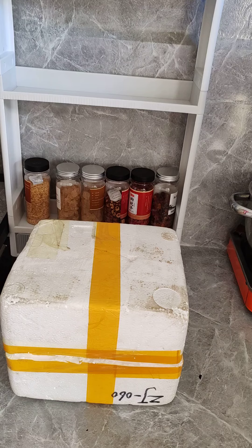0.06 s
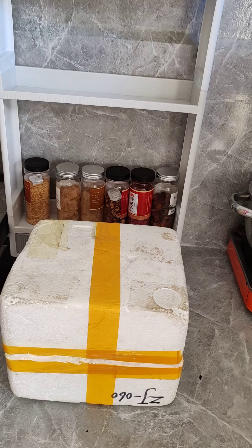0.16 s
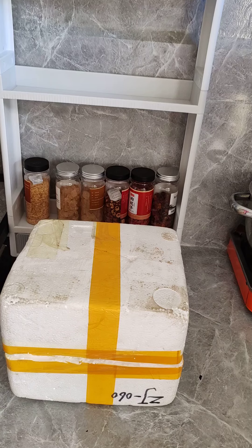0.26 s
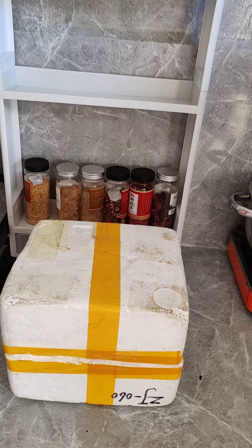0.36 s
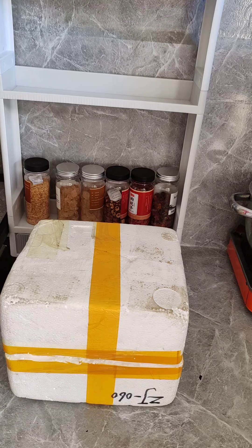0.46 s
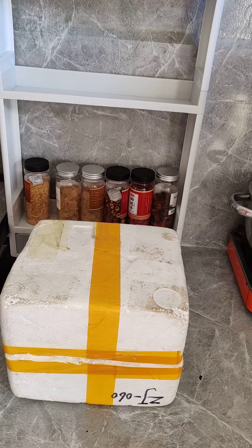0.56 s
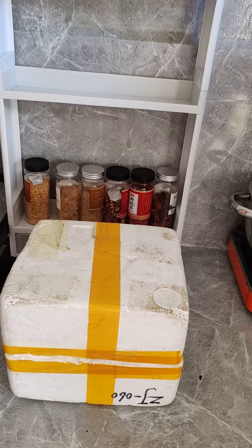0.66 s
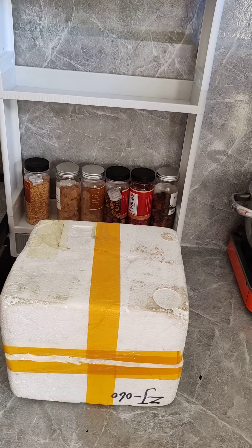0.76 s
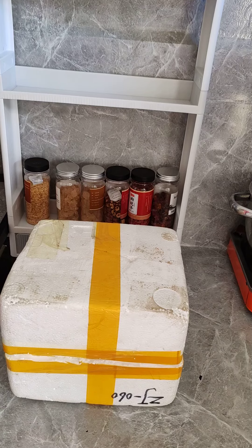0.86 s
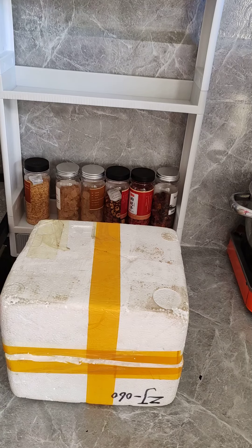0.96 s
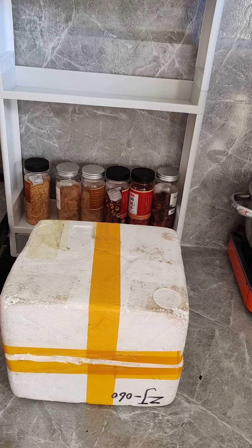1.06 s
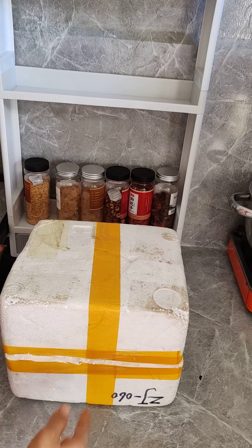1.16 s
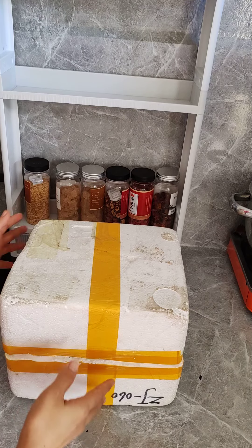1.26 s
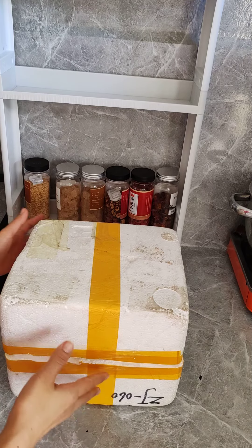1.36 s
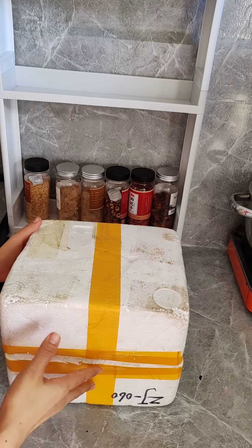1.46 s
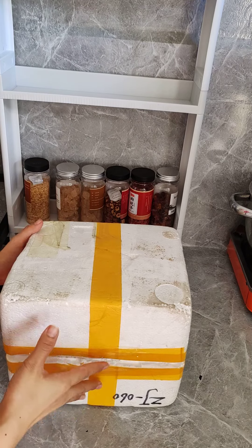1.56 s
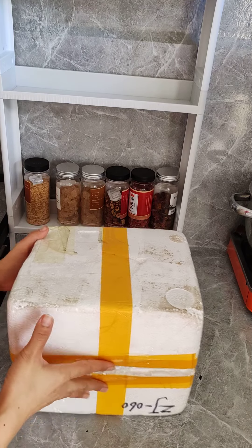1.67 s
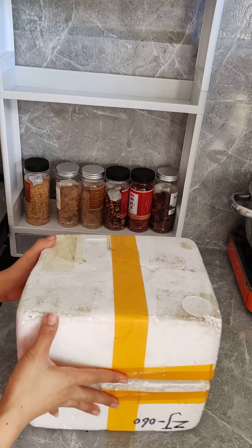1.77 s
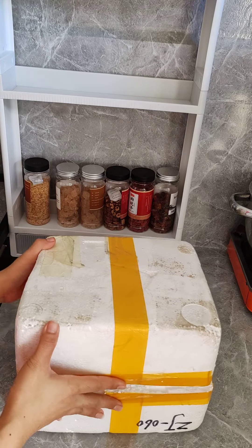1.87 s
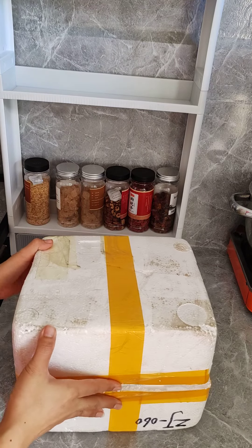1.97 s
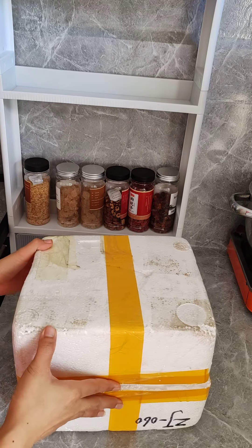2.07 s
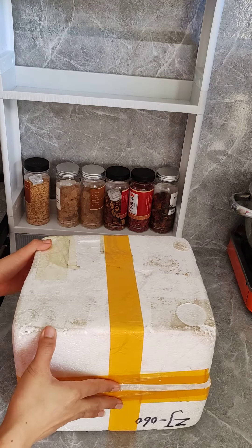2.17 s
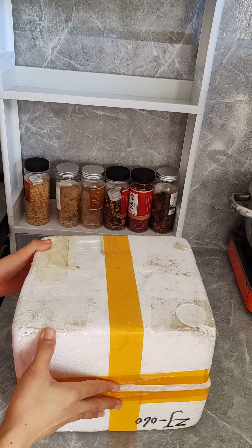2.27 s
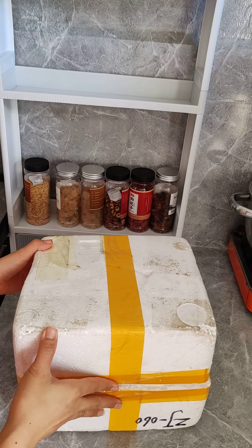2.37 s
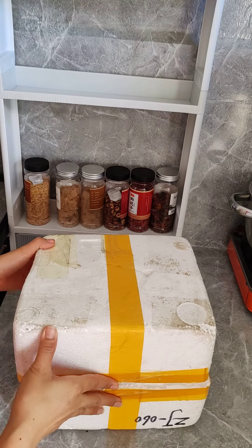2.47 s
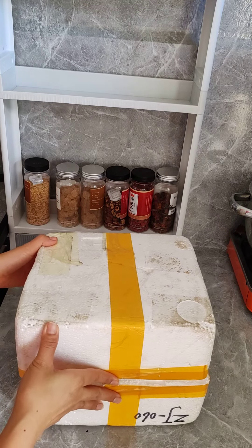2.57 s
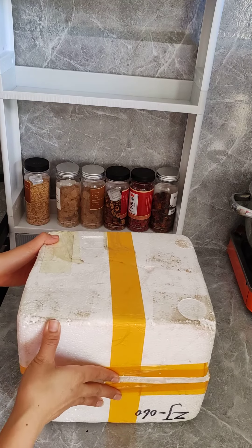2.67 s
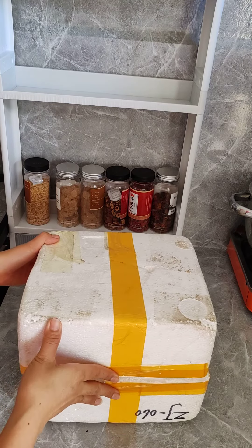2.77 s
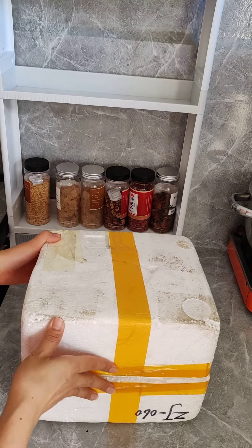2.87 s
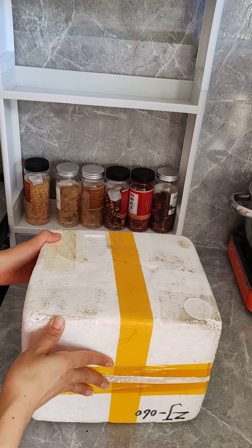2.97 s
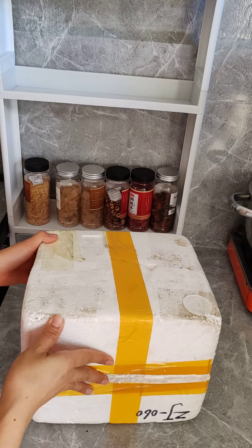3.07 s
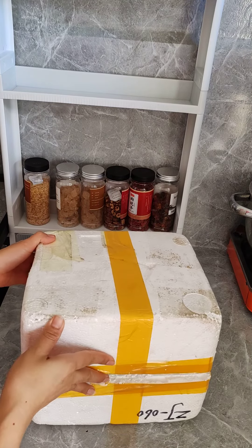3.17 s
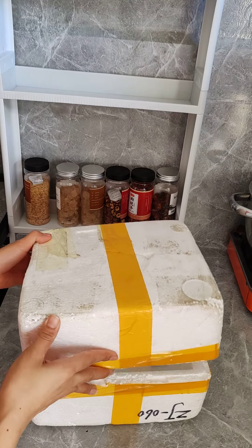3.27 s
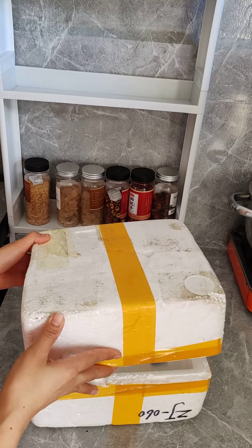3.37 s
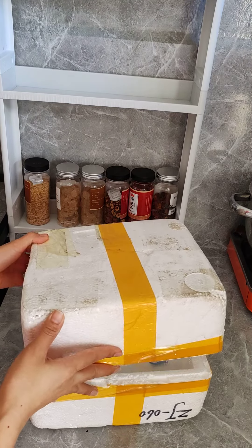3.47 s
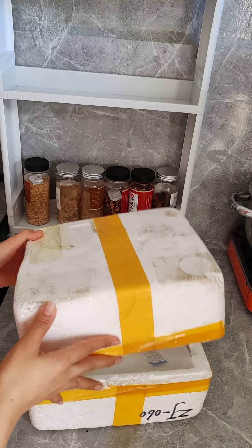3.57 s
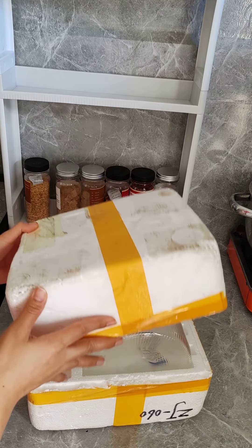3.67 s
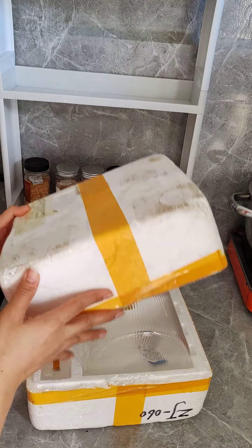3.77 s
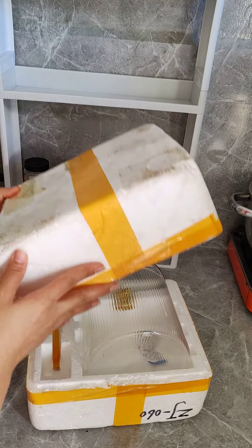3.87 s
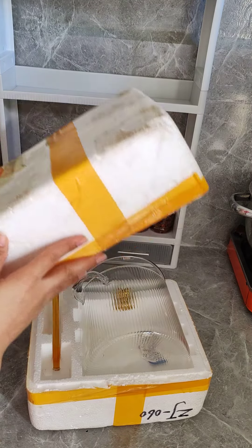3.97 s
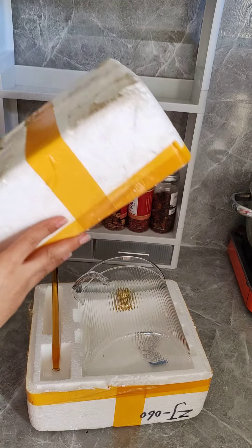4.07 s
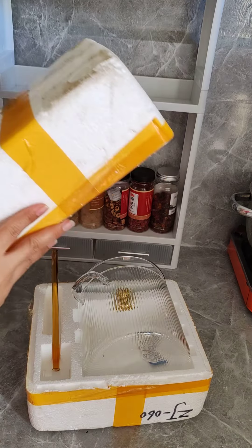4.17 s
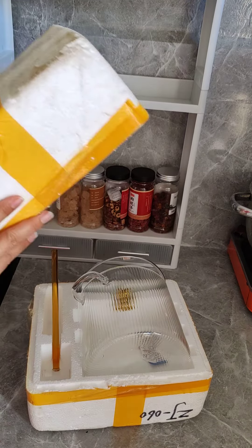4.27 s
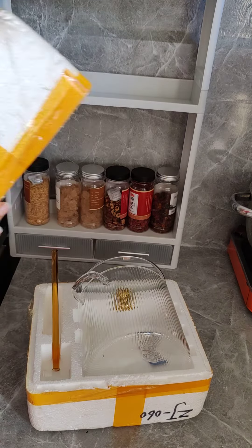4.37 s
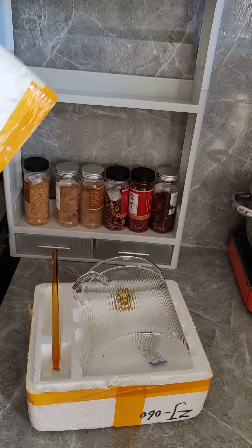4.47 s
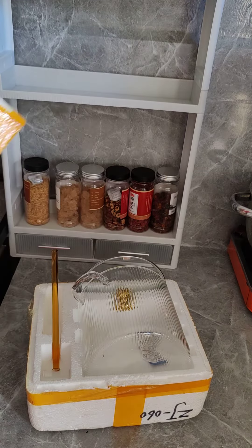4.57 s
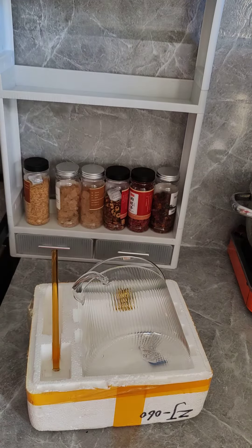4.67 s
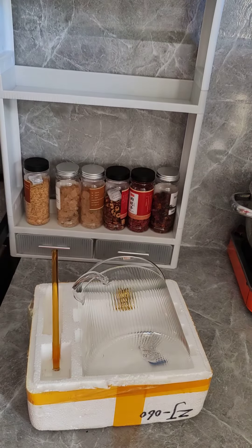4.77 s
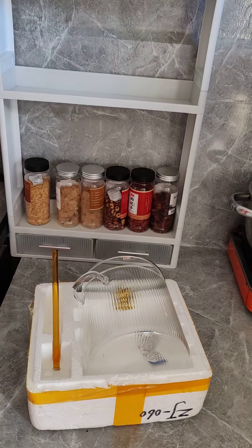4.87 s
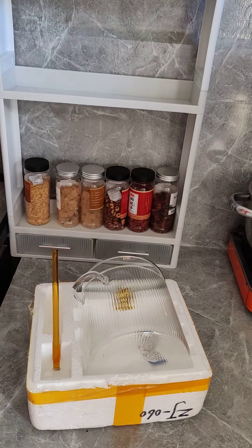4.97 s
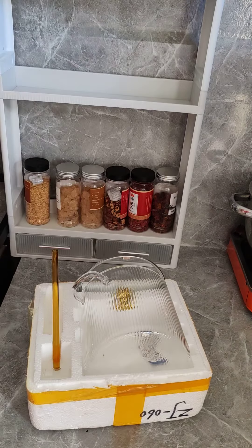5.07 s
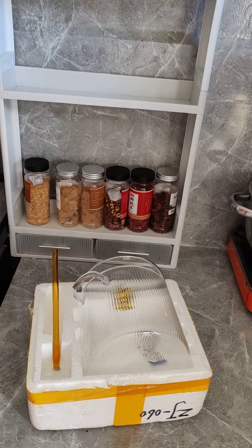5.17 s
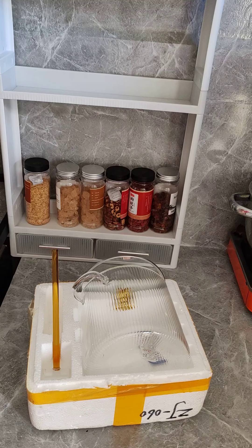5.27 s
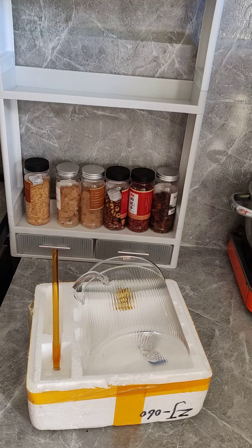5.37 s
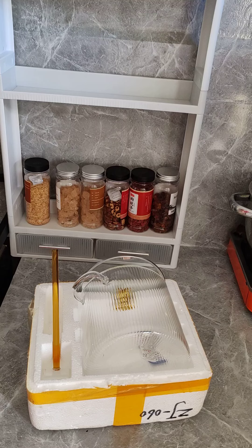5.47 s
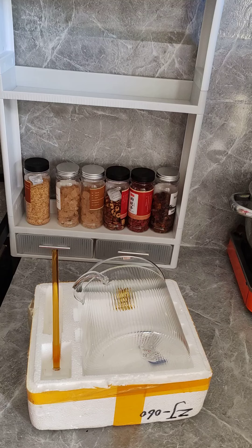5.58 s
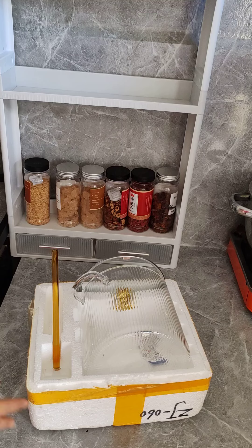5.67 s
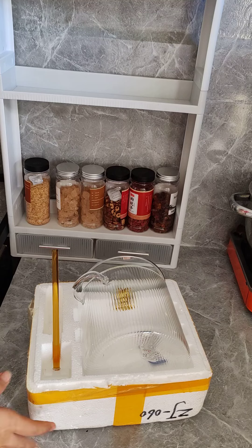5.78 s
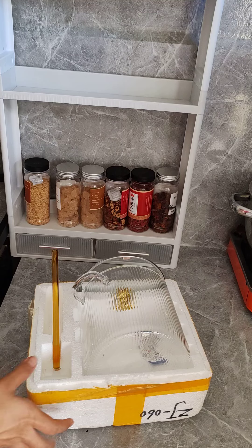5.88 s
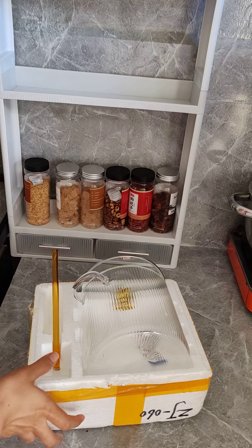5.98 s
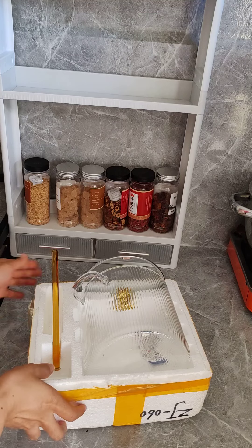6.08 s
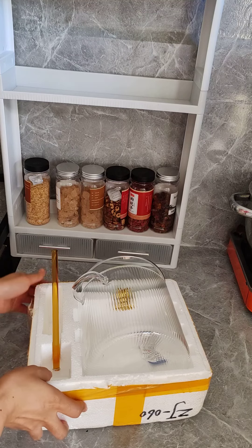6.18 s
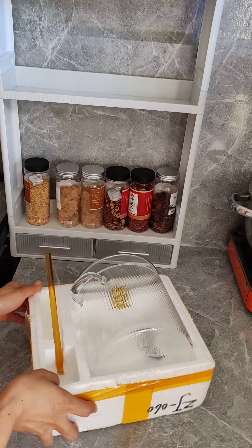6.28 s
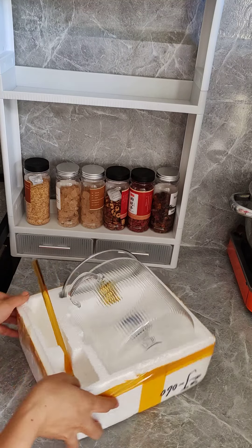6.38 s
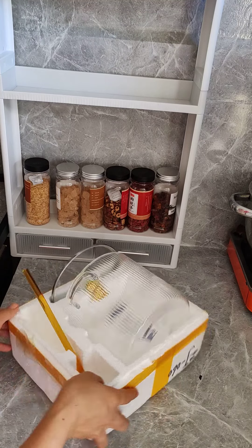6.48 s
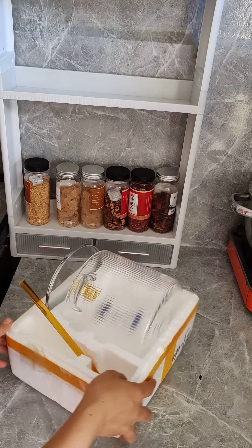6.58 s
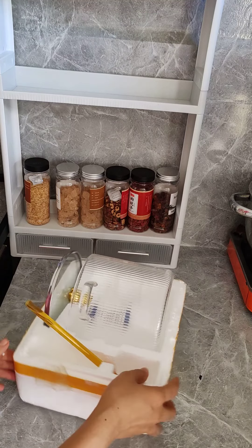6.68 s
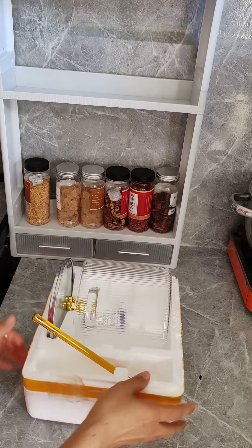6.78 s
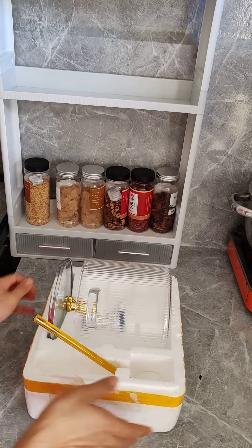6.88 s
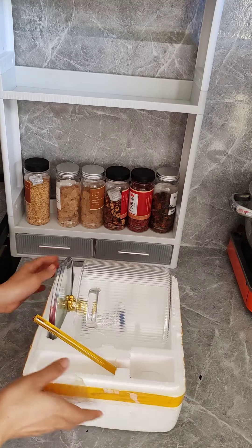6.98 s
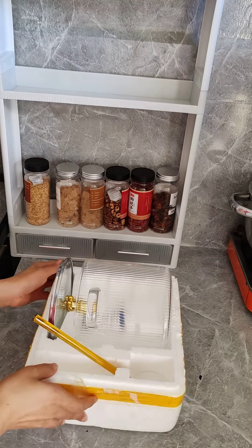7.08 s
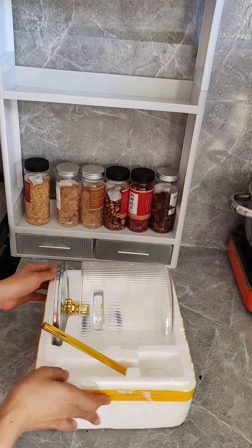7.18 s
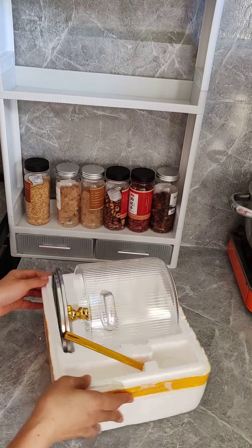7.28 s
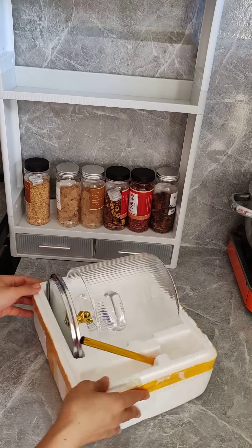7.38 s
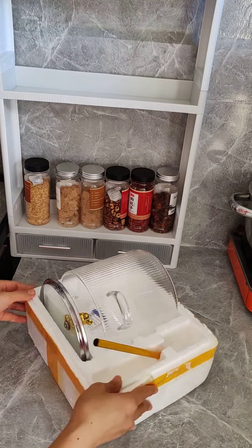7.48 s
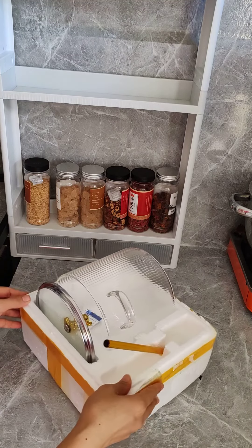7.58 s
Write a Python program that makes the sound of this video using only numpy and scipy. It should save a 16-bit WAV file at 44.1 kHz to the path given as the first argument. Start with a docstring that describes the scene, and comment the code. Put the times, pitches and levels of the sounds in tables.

```python
"""A foam box is dragged over a stone counter, its tight lid worked off with groans and squeaks; it is put down and turned.
Rubbing is shaped noise, stick-slip is a train of jolts or a gliding tone, and contacts are bursts and wall resonances.
A tiled kitchen answers with decaying noise; a low rumble, steady room noise and faint cloth lie underneath.
Two microphones hear the noises alike in the bass and almost unrelated in the treble."""
import sys
import numpy as np
from scipy import signal
from scipy.fft import rfft, irfft, next_fast_len
from scipy.io import wavfile
from scipy.ndimage import uniform_filter1d, map_coordinates

SR = 44100
rng = np.random.default_rng(int(sys.argv[2]) if len(sys.argv) > 2 else 0)


def wav_record(signal):
    """Record a signal, one row per channel, as 16-bit PCM in the file named by sys.argv[1]."""
    frames = np.transpose(np.atleast_2d(signal))
    bounded = np.clip(frames, -1, 1)
    # unit amplitude maps onto the largest positive 16-bit level
    quanta = np.round(bounded * 32767).astype(np.int16)
    wavfile.write(sys.argv[1], SR, quanta)


N = 336483
T = np.arange(N) / SR  # s
TOP_HZ = 16000  # upper band limit
SAG_JITTER, RISE_JITTER = 0.08, 0.034  # relative slip-rate jitter: slowing slips stumble, rising ones run evenly


def amp(db):
    """Level definition: the amplitude ratio of a level in dB."""
    return 10 ** (np.asarray(db) / 20)


def unit(x):
    """Normalization: x scaled to rms 1."""
    return x / np.sqrt(np.mean(x ** 2) + 1e-20)


def along(points, hz):
    """Logarithmic frequency scale: linear interpolation of (f/Hz, value) points over log frequency."""
    f, value = np.transpose(points)
    return np.interp(np.log(hz + 1), np.log(f + 1), value)


def spectrum(points):
    """Spectral shaping: a magnitude response through (f/Hz, level/dB) points."""
    return lambda hz: amp(along(points, hz))


def wobble(rate):
    """Band-limited fluctuation: a spline through random knots, rate of them a second."""
    knots = rng.standard_normal(int(N * rate / SR) + 4)
    return map_coordinates(knots, [T * rate])


def filtered(x, response):
    """Linear filtering: the spectrum of x times a complex frequency response."""
    m = next_fast_len(N + SR // 2)
    hz = np.fft.rfftfreq(m, 1 / SR)
    return irfft(rfft(x, m) * response(hz), m)[..., :N]


# Coherence of the two microphones: f/Hz, left-right likeness (1 = identical)
ALIKE = [(45, 0.91), (290, 0.9), (640, 0.36), (1400, 0.032), (15000, 0.07)]


def likeness(colour):
    """Spatial coherence: mid and side weights make the bass alike and the treble nearly unrelated."""
    def weights(hz):
        turn = np.arccos(np.clip(along(ALIKE, hz), -1, 1)) / 2
        return colour(hz) * [np.cos(turn), np.sin(turn)]
    return weights


def rush(colour, grain_db=0, patchy_db=0):
    """Modulated noise: stereo noise of rms 1, broken into uneven grains and passing patches of frequency."""
    z = signal.stft(rng.standard_normal((2, N)), nperseg=512)[2]
    field = uniform_filter1d(rng.standard_normal(z.shape[1:]), 3, axis=0)
    field = uniform_filter1d(field, 8, axis=1)
    pair = signal.istft(z * amp(patchy_db * unit(field)), nperseg=512)[1][:, :N]
    grain = amp(grain_db * (wobble(300) + 0.5 * wobble(40)))
    mid, side = filtered(pair * grain, likeness(colour))
    return unit(np.array([mid + side, mid - side]))


# Spectral density of the steady room noise: f/Hz, relative level per Hz/dB
AIR = [(60, -26.5), (90, -9.5), (270, -10.5), (500, -18.5), (960, -21.5), (2500, -33), (9000, -56.5),
       (12000, -100)]


def room_noise():
    """Stationary noise: a constant hush, strongest in the bass."""
    return amp(-57.0) * rush(spectrum(AIR))


# Level of the rumble in time: t/s, level/dB
RUMBLE = [(.2, -65), (.35, -53), (1.46, -55.5), (2.25, -45), (3.0, -50), (3.9, -65.5), (4.25, -48.5),
          (4.45, -64), (4.85, -47.5), (5.05, -57.5), (5.66, -44.5), (6.28, -49.5), (6.5, -42.5),
          (7.3, -54.5), (7.5, -43), (7.63, -48)]
# Spectral density of the rumble: f/Hz, relative level per Hz/dB
LOW = [(28, -44), (38, -5.5), (46, -2.5), (62, -11), (95, -19.5), (130, -71)]


def rumble():
    """Low-frequency noise: a narrow bass band whose level rises and falls slowly."""
    level_db = np.interp(T, *np.transpose(RUMBLE))
    return amp(level_db) * rush(spectrum(LOW))


# Cloth moving near by: start t/s, swell/s, peak level/dB, fade/(dB/s)
RUSTLE = [(.22, 0.13, -60, 148), (0.512, 0.035, -49.5, 110), (.62, 0.17, -63.5, 39)]
# Spectral density of the cloth: f/Hz, relative level per Hz/dB
CLOTH = [(700, -34), (1550, -3.5), (2400, -6), (4500, -8.5), (6600, -7.5), (7600, -19), (9500, -66)]
RUSTLE_SWELL_DB = 18  # start of a rustle below its peak


def rustle():
    """Friction noise of cloth: each move swells and then decays exponentially."""
    moves = np.zeros(N)
    for s, swell, db, fade_db in RUSTLE:
        after_peak = T - s - swell
        drop_db = np.maximum(-RUSTLE_SWELL_DB * after_peak / swell, fade_db * after_peak)
        moves += (T > s) * amp(db - drop_db)
    return moves * rush(spectrum(CLOTH), grain_db=0.5, patchy_db=1.5)


# Reverberation of the tiled kitchen: f/Hz, 60 dB decay time/s
KITCHEN = [(200, 0.73), (800, 0.51), (2000, 0.53), (5500, 0.53), (11000, 0.3)]


def kitchen(x):
    """Reverberation: convolution with noise that decays exponentially, at its own speed in each band."""
    hz, t, z = signal.stft(rng.standard_normal((2, SR * 3 // 4)), SR, nperseg=256)
    decay = amp(-60 * t / along(KITCHEN, hz)[:, None])
    weights = likeness(np.ones_like)(hz)[..., None]
    mid, side = signal.istft(z * decay * weights, SR, nperseg=256)[1]
    tail = np.array([mid + side, mid - side])
    delayed = np.pad(x, ((0, 0), (250, 0)))  # samples before the first reflection
    return signal.fftconvolve(delayed, tail / np.linalg.norm(tail[0]), axes=1)[:, :N]


def mode(f, hz, width):
    """Damped oscillator: the causal frequency response of one resonance."""
    return 1j * f * width / (hz * hz - f * f + 1j * f * width)


# Modes of the foam walls: f/Hz, bandwidth/Hz, level/dB
BOX = [(259, 80, -7), (446, 105, -1), (594, 149, 1.5), (816, 283, -1.5), (1084, 168, -2), (1425, 196, -5.5),
       (2043, 350, -9), (2700, 310, -8)]


def walls(f):
    """Modal superposition: the box walls answer as a sum of resonances with alternating signs."""
    return sum((-1) ** k * amp(db) * mode(f, hz, width) for k, (hz, width, db) in enumerate(BOX))


def struck(blows, soft_hz):
    """Impulse response: the walls' answer to blows, a unit blow peaking at 1; soft contact dulls the treble."""
    soft_walls = lambda f: walls(f) / (1 + 1j * f / soft_hz) ** 2
    answer, single = filtered(np.array([blows, T == 0]), soft_walls)
    return answer / np.abs(single).max()


# Weight landing on the counter: t/s, level/dB, f/Hz
THUDS = [(2.01, -19.5, 205), (3.215, -36.5, 480), (5.491, -24, 127), (6.364, -29, 465)]


def thuds():
    """Damped vibration: each landing is a low sine with a soft onset and an exponential decay."""
    out, t = np.zeros(N + SR), np.arange(SR // 5) / SR
    for s, db, hz in THUDS:
        envelope = amp(db - 60 * t / 0.056) * (1 - np.exp(-t / 0.00051))
        out[round(s * SR):][:len(t)] += envelope * np.sin(2 * np.pi * hz * t)
    return out[:N]


# Sharp contacts: t/s, crack level/dB before filtering, wall knock relative to it/dB, crack centre f/Hz
TAPS = [(1.259, -55.5, -30, 4470), (1.5807, -31, 7.5, 1100), (1.6536, -22, -31, 6730),
        (1.6766, -14, -15.5, 2500), (2.0141, -18, -24, 3930), (2.2532, -15, -38, 4500),
        (2.8761, -15.5, -6.5, 2330), (2.939, -24, -3, 1500), (3.0261, -16.5, -18.5, 5980),
        (3.1273, -13.5, -8.5, 4750), (4.1441, -37, -11, 5940), (4.96, -37.5, 4, 1197),
        (5.3146, -35, -17, 3040), (5.4878, -11.5, -11, 2580), (5.6189, -10.5, -20, 2426),
        (6.364, -25, -6, 2000), (6.735, -15, -11.5, 2500), (7.151, -33, -21, 1226),
        (7.323, -13.5, -37, 5590), (7.601, -7, -10, 1605)]


def taps():
    """Impact excitation: a short band-pass noise crack, with a blow that sets the walls ringing."""
    crack, knock, t = np.zeros((2, N + SR)), np.zeros(N), np.arange(SR // 20) / SR
    for s, db, knock_db, hz in TAPS:
        at = round(s * SR)
        envelope = amp(db - 60 * t / 0.033) * (1 - np.exp(-t / 0.00083))
        burst = envelope * rng.standard_normal((2, len(t)))
        crack[:, at:at + len(t)] += signal.lfilter(*signal.iirpeak(hz, 0.9, SR), burst)
        knock[at] = amp(db + knock_db)
    dull = lambda f: 1 / (1 + 1j * f / 9000) ** 2
    return filtered(crack[:, :N], dull) + struck(knock, soft_hz=2600)


def slip_phase(length, first_hz, last_hz, jitter):
    """Stick-slip kinematics: accumulated cycles of an unsteady glide, and its rise and fall."""
    u = np.linspace(0, 1, round(length * SR))
    drift = np.interp(u, np.linspace(0, 1, 16), rng.standard_normal(16))
    rate = (first_hz + (last_hz - first_hz) * u) * (1 + jitter * drift)
    return np.cumsum(rate) / SR, np.sqrt(np.abs(np.sin(np.pi * u)))


def slip_times(cycles):
    """Relaxation oscillation: one slip, as a sample index, at every completed cycle."""
    return np.flatnonzero(np.diff(np.floor(cycles)))


# Skipping of the lid's rim: t/s, length/s, first slip f/Hz, last slip f/Hz, first level/dB, ring f/Hz
CHATTER = [(2.503, .08, 190, 170, -24.5, 4320), (3.7246, 0.063, 270, 200, -7.5, 4650),
           (3.807, 0.05, 300, 190, -11.5, 4535)]
RING_SCATTER = 0.09  # relative spread of the ring frequency


def chatter():
    """Resolved stick-slip: each slip of the lid's rim rings the rubbing patch briefly at a scattered pitch."""
    out, t = np.zeros((2, N)), np.arange(SR // 60) / SR
    for s, length, first_hz, last_hz, db, ring_hz in CHATTER:
        cycles, _ = slip_phase(length, first_hz, last_hz, jitter=SAG_JITTER)
        for at in slip_times(cycles):
            stray, left, right, lead = rng.standard_normal(4)
            level_db = db - 6 * at / len(cycles) + 2 * np.array([[left], [right]])
            envelope = amp(level_db - 60 * t / 0.012) * (1 - np.exp(-t / 0.00039))
            phase = 2 * np.pi * ring_hz * (1 + RING_SCATTER * stray) * t + [[0], [lead]]
            out[:, round(s * SR) + at:][:, :len(t)] += envelope * np.sin(phase)
    return out


# Pitched stick-slip: t/s, length/s, first f/Hz, last f/Hz, level before fading/dB,
# step per overtone/dB, roughness (0 = clean tone)
SQUEAKS = [(0.35, 0.074, 1764, 1730, -50, -26, 2.5), (1.466, 0.02, 3250, 3120, -59.5, -30, 1.5),
           (1.515, 0.025, 3100, 3070, -55.5, -30, 1.5), (1.843, 0.025, 2010, 2510, -23.5, -12, 0.93),
           (2.014, 0.015, 1500, 5910, -26, 10, 0.41), (2.26, 0.093, 1737, 1590, -33.5, -8, 1.1),
           (2.982, 0.014, 2444, 2360, -13.5, -23.5, 0.3), (3.379, 0.01, 5020, 2700, -22, -12, 0.7),
           (3.386, .017, 2530, 2700, -24, 0, 0.35), (3.395, 0.032, 2808, 2868, -16, -11.5, .9),
           (3.416, 0.032, 2500, 2260, -26, -11, 0.83), (3.66, 0.025, 1218, 1258, -25.5, -1, 0),
           (3.674, 0.014, 1855, 1995, -24.5, -4, 0.4), (3.684, 0.021, 2720, 2880, -14, -3, 0.2),
           (3.705, 0.025, 4200, 4750, -11.5, -8, 0.36), (3.727, 0.016, 5000, 6630, -12, -12.5, 0.8),
           (3.775, 0.022, 4090, 3820, -22, 3.5, 0.43), (3.783, 0.014, 3723, 4824, -15.5, -14, 0.6),
           (3.794, .016, 3508, 3720, -14.5, -3, 0.35), (5.4146, 0.016, 3365, 3047, -22.5, -23, 0.87)]
SQUEAK_FADE_DB_PER_S = 58.5


def squeaks():
    """Periodic stick-slip: gliding harmonics broken by rough contact, with each ear's own phase and balance."""
    out, k = np.zeros((2, N + SR)), np.arange(6)[:, None]
    for s, length, first_hz, last_hz, db, step_db, rough in SQUEAKS:
        cycles, swell = slip_phase(length, first_hz, last_hz, jitter=0.012 + 0.03 * min(rough, 1))
        n = len(cycles)
        swell = swell * amp(-SQUEAK_FADE_DB_PER_S * T[:n])
        top = (k + 1) * max(first_hz, last_hz)
        heard = (top < TOP_HZ) / (1 + (top / 9500) ** 6)  # high overtones are weakened
        shared = wobble(500)[:n]
        for ear in out:
            broken = unit(1 + rough * (shared + 0.3 * wobble(500)[:n]))
            level = amp(db + step_db * k + rng.normal(0, 1.3, k.shape)) * heard
            phase = 2 * np.pi * ((k + 1) * cycles + 0.35 * rng.random(k.shape))
            tone = (level * np.sin(phase)).sum(axis=0)
            ear[round(s * SR):][:n] += swell * broken * tone
    return out[:, :N]


# Slow stick-slip shaking the walls: t/s, length/s, first slip f/Hz, last slip f/Hz, jolt level/dB before the swell
GROANS = [(1.838, 0.037, 335, 270, -24.5), (2.025, 0.046, 217, 186, -25.5), (2.458, 0.054, 188, 217, -15.5),
          (2.587, 0.036, 566, 670, -28), (2.642, .046, 820, 860, -28), (2.876, 0.038, 355, 290, -20.5),
          (3.389, 0.053, 130, 112, -21.5), (3.51, 0.035, 150, 130, -31.5), (4.406, 0.075, 460, 380, -44.5),
          (5.485, 0.043, 268, 220, -22.5), (6.794, 0.041, 354, 352, -23), (6.822, .05, 325, 393, -17.5),
          (7.604, 0.027, 450, 525, -29)]


def groans():
    """Slow stick-slip: every slip is a jolt into the resonant walls and a burst of grit noise."""
    jolts = np.zeros(N + SR)
    for s, length, first_hz, last_hz, db in GROANS:
        jitter = SAG_JITTER if last_hz < first_hz else RISE_JITTER
        cycles, swell = slip_phase(length, first_hz, last_hz, jitter)
        at = slip_times(cycles)
        uneven_db = 1.7 * rng.standard_normal(len(at))
        jolts[round(s * SR) + at] += amp(db + uneven_db) * swell[at] ** 1.4
    jolts = jolts[:N]
    grit = signal.lfilter([1], [1, -0.97], jolts) * rush(spectrum(SCRAPE))  # each jolt decays in the grit
    return struck(jolts, soft_hz=1500) + amp(-7.0) * grit


# Spectral density of the scraping beads, also the groans' grit: f/Hz, relative level per Hz/dB
SCRAPE = [(300, -51), (900, -5.5), (1500, -2), (2600, -5), (4500, -4), (7000, -4.5), (10000, -18),
          (16000, -36)]
# Spectral density of the finest hiss: f/Hz, relative level per Hz/dB
HISS = [(4000, -31.5), (7500, -3.5), (9500, -9.5), (13000, -12.5), (16000, -21.5)]
# Strokes of foam on stone, foam and skin: t/s, swell/s, fade/s, scrape peak level/dB, loss over the fade/dB,
# wall level over scrape at the peak/dB, hiss level over scrape at the peak/dB, strongest band f/Hz
STROKES = [(1.577, 0.038, 0.016, -39.5, 25, 1.5, -8, 1500),
           (1.653, 0.0046, 0.069, -37.5, 5, -10.5, -32, 2500),
           (1.72, 0.13, 0.012, -31.5, 8, -8, -12.5, 2560), (1.833, 0.038, 0.17, -29, 14, -13, -11, 2190),
           (2.01, .006, 0.14, -31.5, 19, -2, -9, 3420), (2.259, 0.0035, 0.1, -34, 17, -28.5, -3, 6700),
           (2.333, 0.013, 0.16, -59.5, -12, 9, -16.5, 3000), (2.457, 0.018, 0.073, -31, 9, -0.5, -34, 3080),
           (2.549, 0.11, 0.037, -26.5, 3.5, -12.5, -26, 2770),
           (2.874, 0.0029, 0.14, -34.5, 4, 1.5, -27, 2600), (3.042, 0.0098, 0.24, -44, 18, 0, -14, 2600),
           (3.337, .002, 0.042, -43, 8, -2, -14, 4400), (3.373, 0.018, 0.03, -29.5, 1, -33, 0, 4840),
           (3.393, 0.028, .13, -26, 27, -6.5, -13.5, 2950), (3.661, 0.02, 0.022, -20, 4, -37.5, -9.5, 4960),
           (3.72, 0.022, 0.15, -30, 8, -29, 7, 5300), (4.322, 0.0016, 0.045, -46.5, 18.5, -1.5, -15, 6000),
           (4.4, 0.0038, 0.044, -43.5, 8, 2.5, -6.5, 5700),
           (4.608, 0.0072, 0.08, -58.5, 24, 5, -11.5, 6040), (4.669, 0.031, 0.11, -58, 14, 3, -2.5, 6030),
           (4.8, 0.06, 0.065, -58.5, 6, 1, -5, 5570), (4.959, 0.0019, 0.076, -47, 19.5, -2, -12.5, 3950),
           (5.414, 0.0022, 0.076, -26, 15.5, -30, -12.5, 2960),
           (5.485, 0.0059, 0.25, -38, 8, -2, -22.5, 2600), (6.19, .04, 0.067, -64.5, 17.5, 6.5, -0.5, 4970),
           (6.366, 0.0019, 0.03, -41, -4, -2.5, -10.5, 3430), (6.4, 0.051, 0.39, -33.5, 7, -11.5, -4, 2680),
           (6.789, 0.11, 0.063, -35, 11.5, -8, -3.5, 4470), (7.196, 0.0072, 0.043, -50.5, -1, 9, -11, 4200),
           (7.25, 0.067, 0.024, -35.5, -3, -14.5, -7, 4000), (7.321, 0.011, 0.32, -33, 8, -14, -6, 3300),
           (7.56, 0.051, 0.008, -40.5, 5, 0, -4.5, 4100)]
SWELL_DB = 6.5  # first touch below the peak
WALL_FOLLOWS, HISS_FOLLOWS = 0.44, 1.25  # dB of wall and hiss per dB of scrape


def strokes():
    """Sliding friction: pressure drives scraping beads, the walls they shake and the finest hiss."""
    beads = rush(spectrum(SCRAPE), grain_db=1.8, patchy_db=2)
    shaken = rush(walls, grain_db=2.0, patchy_db=-0.5)
    hiss = rush(spectrum(HISS), patchy_db=2)
    out = np.zeros((2, N))
    for s, swell, fade, db, lost_db, wall_db, hiss_db, hz in STROKES:
        end, release = s + swell + fade, 0.02  # s
        span = slice(round(s * SR), round((end + release) * SR))
        t = T[span]
        onset = np.clip((t - s) / max(0.002, swell / 4), 0, 1)
        touch = onset * np.clip(1 + (end - t) / release, 0, 1)
        press_db = np.interp(t, [s, s + swell, end], [-SWELL_DB, 0, -lost_db])
        # the size of the rubbing patch favours one broad band and thins what lies far below it
        thinned = signal.lfilter(*signal.butter(2, 0.33 * hz, "high", fs=SR), beads[:, span])
        favoured = signal.lfilter(*signal.iirpeak(hz, 1.6, SR), beads[:, span])
        rubbing = amp(press_db) * unit(1.2 * thinned + favoured)
        rubbing += amp(wall_db + WALL_FOLLOWS * press_db) * shaken[:, span]
        rubbing += amp(hiss_db + HISS_FOLLOWS * press_db) * hiss[:, span]
        out[:, span] += touch * amp(db) * rubbing
    return out


def scene():
    """Superposition: direct sound, reverberation and background; groans and squeaks reach the tiles more weakly."""
    foam = strokes() + taps() + thuds()
    groan, squeak = groans(), squeaks() + chatter()
    to_tiles = amp(-3.5) * foam + amp(-11) * groan + amp(-6) * squeak
    background = rumble() + rustle() + room_noise()
    return foam + groan + squeak + kitchen(to_tiles) + background


def record(dry):
    """Band limitation: the sound fades in after a short silence and keeps nothing above the band limit."""
    opening = np.clip((T - 0.18) / 0.049, 0, 1) ** 2  # silence/s, fade-in/s
    return filtered(dry * opening, lambda hz: hz < TOP_HZ)


dry = scene()
out = record(dry)
wav_record(out)
```